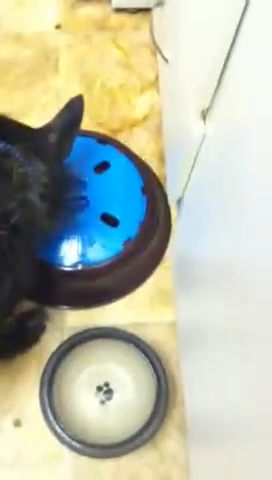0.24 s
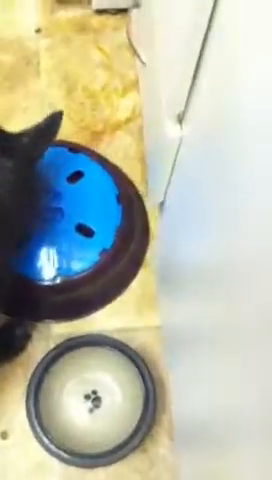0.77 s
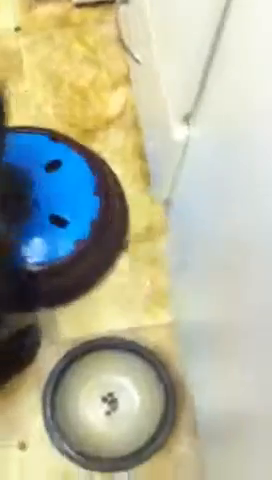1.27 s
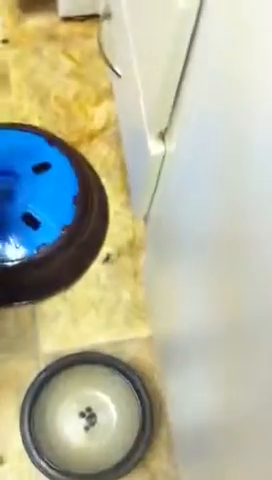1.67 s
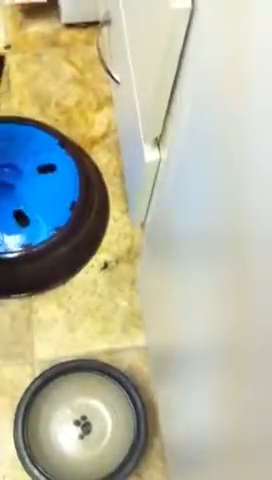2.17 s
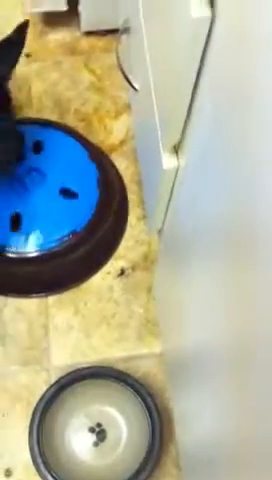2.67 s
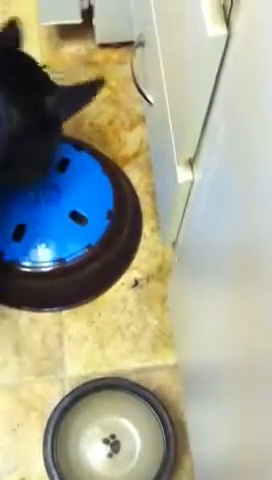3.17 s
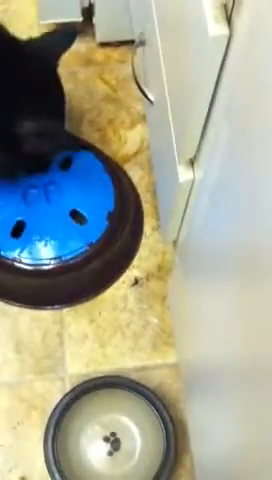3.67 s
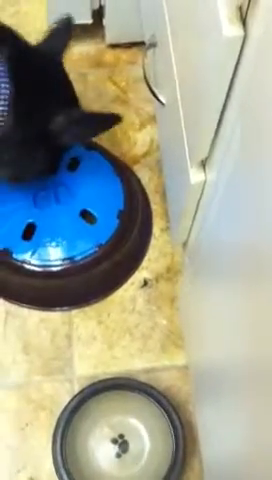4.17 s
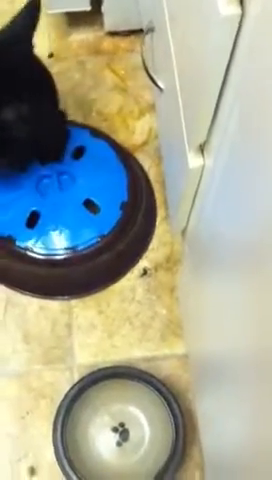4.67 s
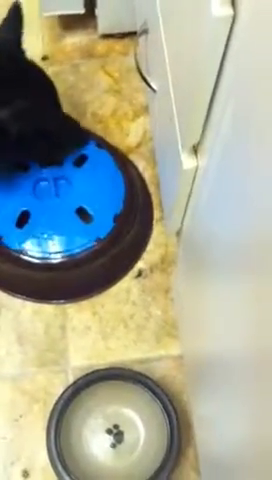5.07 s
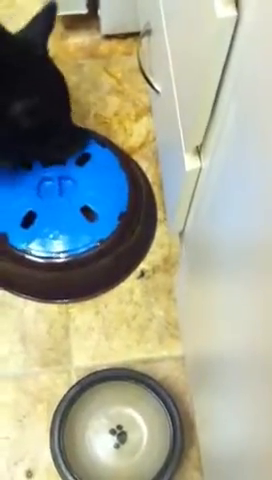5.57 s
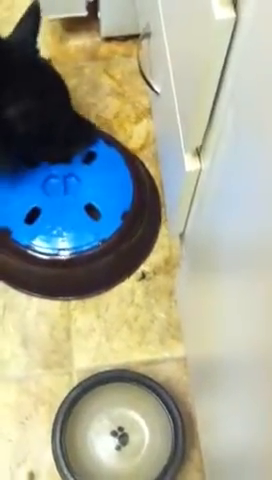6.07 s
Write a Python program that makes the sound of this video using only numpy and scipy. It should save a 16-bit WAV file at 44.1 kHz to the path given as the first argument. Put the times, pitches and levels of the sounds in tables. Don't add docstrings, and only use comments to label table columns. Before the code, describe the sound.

A steady, soft broadband hush and a faint low refrigerator hum hold throughout, in a small kitchen with a short reverberation, heard by a close phone. From 0 to 0.8 seconds only faint, thin collar tags chink. Light plastic taps and pellet ticks start around 0.8, then a strong hollow knock lands at 1.4, with kibble rattling and a rim rap near 1.8. Tags jingle brightly around 2.0 to 2.2. From 2.4 to 3.1 small knocks, clicks and chinks cluster, then stay scattered until a heavy bump near 3.97. Jingling brightens at 4.1 and is busy at 4.4 to 4.9. A loud hollow crack comes at 4.9, followed by dense irregular knocks, floor thuds, lid jolts and sharp kibble snaps through 5.3. Brief lighter gaps follow, with crisp bursts at 5.9 and 6.2, stopping mid-activity around 6.3.

```python
import sys
import numpy as np
from scipy import signal
from scipy.fft import rfft, irfft, next_fast_len
from scipy.io import wavfile

SR = 44100
rng = np.random.default_rng(int(sys.argv[2]) if len(sys.argv) > 2 else 0)


def persist_wave(psi):
    counts = np.round(np.clip(psi, -1, 1) * 32767).astype(np.int16)
    wavfile.write(sys.argv[1], SR, np.atleast_2d(counts).T)


def undo_db(level):
    steps = np.asarray(level, float) / 20
    return 10 ** steps


N = 279153


def along(points, hz):
    f, v = np.transpose(points)
    return np.interp(np.log(hz + 1), np.log(f + 1), v)


def wobble(rate_hz):
    knots = rng.standard_normal(int(N * rate_hz / SR) + 2)
    return np.interp(np.arange(N) * rate_hz / SR, np.arange(len(knots)), knots)


def sample_at(times):
    return np.clip(np.round(times * SR).astype(int), 0, N - 1)


def ring(times, levels_db, body, spread_db, scatter, contact_s, wander, flutter_db):
    modes = [(part, *mode) for part, family in enumerate(body) for mode in family]
    chance = rng.standard_normal((len(times), len(modes), 2))
    where = sample_at(times)
    rise = np.exp(-1 / (abs(contact_s) * SR))
    out = np.zeros(N)
    for k, (part, hz, db, t60) in enumerate(modes):
        turn = np.exp(2j * np.pi * hz / SR * np.cumsum(1 + wander * wobble(rate_hz=25)))
        size = undo_db(levels_db[:, part] + db + spread_db * chance[:, k, 0])
        phase = np.exp(1j * scatter * chance[:, k, 1])
        blows = np.zeros(N, complex)
        np.add.at(blows, where, size * phase / turn[where])
        decay = undo_db(-60 / t60 / SR)
        swing = signal.lfilter([1 - rise], np.poly([rise, decay]), blows)
        out += undo_db(flutter_db * wobble(rate_hz=45)) * np.imag(swing * turn)
    return out


def crack(times, levels_db, lo_hz, hi_hz, t60):
    blows = np.zeros(N)
    np.add.at(blows, sample_at(times), undo_db(levels_db))
    fade = signal.lfilter([1], [1, -undo_db(-60 / t60 / SR)], blows)
    band = signal.butter(2, [lo_hz, hi_hz], "band", fs=SR, output="sos")
    return signal.sosfilt(band, signal.sosfilt(band, fade * rng.standard_normal(N)))


def kinds(*pairs):
    return [(*row[:2], *colour, *row[2:]) for table, colour in pairs for row in table]


def scattered(events, count, lag_s, drop_db):
    rows = np.array(events)
    levels_db = rows[:, 1:2] + np.pad(rows[:, 2:], ((0, 0), (1, 0)))
    bounce = np.arange(count)
    draw = rng.random((len(rows), count, 2))
    lag = np.cumsum(2 * lag_s * draw[:, :, 0] * np.sign(bounce), axis=1)
    loss_db = drop_db * bounce * (1 + draw[:, :, 1]) / 2
    times = (rows[:, :1] + lag).ravel()
    return times, np.concatenate(levels_db[:, None] - loss_db[:, :, None])


def joined(*contacts):
    return [np.concatenate(part) for part in zip(*contacts)]


# t/s, push on the bowl level/dB, swing of the collar level/dB
STIR = [(0.0, -83, -71), (1.07, -59, -92), (1.34, -47, -59.5), (2.73, -56, -61), (2.94, -53.5, -55.5),
        (3.3, -49, -74), (3.75, -52.5, -51), (4.15, -46.5, -43.5), (4.33, -49, -59.5), (4.71, -46, -47),
        (4.85, -50, -37), (5.09, -44.5, -65), (5.399, -45, -43), (5.55, -47, -82), (5.82, -51, -81),
        (6.05, -41.5, -71), (6.33, -51.5, -55)]


def restless(column, count, size_db, groups_db):
    rows, draw = np.array(STIR), rng.random((count, 2))
    times = draw[:, 0] * N / SR
    size = np.interp(times, rows[:, 0], rows[:, column]) - size_db * np.log(1 - draw[:, 1])
    return times, size[:, None] + np.array(groups_db)


# f/Hz, level/dB per Hz
HUSH = [(25, -24), (98, -24), (145, -1.5), (500, -7), (2000, -23.5), (10000, -35), (11600, -45),
        (12500, -46)]


def hush():
    m = next_fast_len(N + 8192)
    spectrum = rfft(rng.standard_normal(m)) * undo_db(along(HUSH, np.fft.rfftfreq(m, 1 / SR)))
    noise = irfft(spectrum, m)[:N]
    noise /= np.sqrt(np.mean(noise ** 2) + 1e-20)
    return undo_db(-52.5 + 0.12 * wobble(rate_hz=3)) * noise


# f/Hz, level/dB
HUM = [(120, -60.5)]


def refrigerator():
    t = np.arange(N) / SR
    return sum(undo_db(db + 3 + 0.26 * wobble(rate_hz=6)) * np.sin(2 * np.pi * hz * t) for hz, db in HUM)


# f/Hz, t60/s
KITCHEN = [(200, 0.35), (800, 0.27), (4000, 0.3), (12000, 0.32)]


def kitchen(x, count=20):
    hz, t, z = signal.stft(rng.standard_normal((count, SR // 2)), SR, nperseg=256)
    tails = signal.istft(z * undo_db(-60 * t / along(KITCHEN, hz)[:, None]), SR, nperseg=256)[1]
    out, step = np.zeros(N + 2 * SR), N // count + 1
    for k, tail in enumerate(tails):
        echo = signal.fftconvolve(x[k * step:][:step], tail / np.linalg.norm(tail))
        out[k * step + 200:][:len(echo)] += echo
    return out[:N]


# f/Hz, level/dB, t60/s
TAGS = [
    [(6890, -20, 0.044), (9854, -1.5, 0.055), (9900, -14, 0.053), (9430, -13, 0.044)],
    [(8400, 1.5, 0.11), (8560, 2, 0.11)],
    [(11630, -1, 0.058), (11500, -11, 0.067)],
    [(13250, -2, 0.085), (14030, 2, 0.1), (14990, 2.5, 0.075), (10760, 7, .05)],
    [(5530, 2.5, 0.11), (3750, -6.5, 0.06)],
    [(10250, -4, 0.078), (10260, -13, 0.07)],
]
# t/s, peak level/dB, big tag level/dB, side tag level/dB
TAG_ALONE = [(1.6776, -32, -29.0, -24), (1.5436, -34, -28, -20.0), (1.957, -42, -27.0, -17.0),
             (2.1278, -31.5, -28.0, -17), (2.2304, -33.5, -22, -13), (2.9084, -38, -27.0, -20),
             (1.998, -51, -32, -20.0), (2.011, -39, -34.0, -20.0), (2.02, -43.0, -31.0, -19.0),
             (4.036, -41, -30.0, -16.0), (4.396, -26.5, -27, -23), (4.7214, -25, -27.0, 4),
             (4.9365, -32, -37, -18.0), (5.2515, -32, -18, -10), (5.4075, -51.0, -30.0, -18.0),
             (6.2455, -35.5, -27, -14)]
TAG_ON_LOW = [(0.227, -51.5, 0.5, -4), (1.1945, -36.5, -12, -2), (1.7, -33.5, -20, -1),
              (3.6047, -45.5, -24, -8), (3.688, -39, -11.0, -7), (3.8437, -31.5, -19.5, -1.5),
              (3.9394, -51, -23.0, -3.0), (4.4243, -35, -17.0, 9), (4.8798, -52, -19.0, 4.0),
              (5.0676, -33.0, -7, -7), (5.1028, -52.0, -26, -12.5)]
TAG_ON_MIDDLE = [(0.4733, -50.0, -26.0, -8), (0.88, -51, -27.0, -2), (1.0545, -49, -18.0, 1),
                 (1.37, -40, -8, -10), (1.8462, -37.5, -23, -8), (2.731, -33, -37, -2),
                 (2.8053, -57.0, -26.0, -2.0), (2.818, -35.5, -28, -5), (2.996, -29, -29, -15),
                 (3.462, -43, -11.5, 0), (4.4928, -35.0, -28.0, -6), (4.6674, -40, -27, 11),
                 (4.8, -52, -18.0, -5), (4.8258, -38.5, -29.0, -5), (4.863, -39.5, -16, -9),
                 (5.215, -28.5, -31.0, -7.0), (6.195, -41, -24.0, -10)]
TAG_BRUSH = [(0.6564, -47.5, -19.0, -2), (1.773, -37.5, -17, -7), (1.9745, -37.0, -20, 1),
             (1.9896, -28, -19, 5), (2.4627, -44.5, -15, -6), (2.6416, -52, -19.0, 2),
             (2.7107, -38.5, -18, -4), (4.907, -30.5, -33, -4.0), (6.07, -41.0, -15.0, 3.0),
             (6.088, -34, -19, 2.5)]
TAG_ON_BIG = [(0.16, -52.5, -10, -10.0), (0.195, -58, -4, -14.0), (0.2652, -40.5, -9, -1),
              (0.31, -59.0, -11.0, -5.0), (0.355, -50.5, -9.0, -11.0), (1.1341, -41, -20, -5),
              (1.291, -30, -14, -11), (2.1084, -52, -11.0, -13.0), (3.0716, -38.5, -10, -11),
              (3.1497, -35, -5, -7), (3.2758, -35.5, -10.0, -16), (4.0865, -25.5, -27, -11.0),
              (4.1625, -34.0, -4, -1), (5.8613, -43, -6, -15)]
# t/s, peak level/dB
TAG_AGAIN = [(1.2922, -39), (5.532, -54), (2.725, -37), (2.743, -47), (3.7, -36), (4.093, -19),
             (4.107, -26), (4.201, -31), (4.7315, -30), (4.743, -33), (4.76, -30), (4.9375, -19),
             (4.9445, -25), (4.957, -47), (5.745, -48), (5.705, -57)]
# t/s, peak level/dB
MIDDLE_AGAIN = [(4.429, -43), (4.436, -46), (4.675, -42), (4.683, -28), (4.696, -53), (4.509, -43),
                (5.223, -32.5), (5.862, -43)]


def tags():
    # low, middle and high tag level/dB under the name tag
    alone, on_low, on_middle = (-44, -19, -28.5), (-8.5, -14, -19), (-20.5, 0.75, -26)
    brush, on_big = (-26, -6.5, -18.5), (-23, -11, -20.5)
    swung, shivered = (-20.5, -13), (-40, 0)
    struck = kinds((TAG_ALONE, alone), (TAG_ON_LOW, on_low), (TAG_ON_MIDDLE, on_middle),
                   (TAG_BRUSH, brush), (TAG_ON_BIG, on_big))
    again = kinds((TAG_AGAIN, alone + swung), (MIDDLE_AGAIN, on_middle + shivered))
    first = scattered(struck, count=2, lag_s=0.0059, drop_db=12.5)
    times, levels_db = joined(first, scattered(again, count=1, lag_s=0, drop_db=0))
    jingle = restless(column=2, count=300, size_db=4.5, groups_db=[-14.5, -26, -15.0, -35, -36, -10])
    chinks = ring(*joined((times, levels_db - 6.5), jingle), TAGS, spread_db=2.0, scatter=0.57,
                  contact_s=0.0001, wander=0.0061, flutter_db=4.0)
    return chinks + crack(first[0], first[1][:, 0] - 11, lo_hz=4750, hi_hz=12100, t60=0.075)


# f/Hz, level/dB, t60/s
LID = [
    [(1880, 5.5, 0.013), (2530, 1.5, 0.014), (2748, 6.5, 0.0082), (3145, -3, 0.024)],
    [(3860, 6.5, 0.007), (4387, 10, 0.013), (4786, 8.5, 0.011), (5390, -6.5, 0.018), (6590, -1.5, 0.016),
     (6660, -4, 0.02)],
]
# t/s, peak level/dB
DULL_CLICKS = [(0.858, -54), (1.8857, -39.5), (2.531, -45), (3.3924, -39.5), (3.5778, -35.5), (3.5918, -32),
               (3.6423, -35.5), (4.029, -36), (4.7272, -36.5), (4.7498, -29), (4.9727, -49), (5.4585, -40),
               (5.6539, -28), (5.784, -38), (5.9445, -27), (6.3126, -44.5)]
# t/s, peak level/dB, bright modes relative to it
# level/dB
PELLET_CLICKS = [(0.7657, -50, -8), (1.2416, -49, -10), (2.0366, -44, -14), (2.3401, -45.0, -13.0),
                 (2.405, -44.5, -16.0), (2.596, -39.5, -13), (2.9014, -45, -15), (3.076, -44, -8),
                 (3.1181, -40.5, -1), (3.3536, -45.5, -15), (3.4246, -41.0, -8), (3.7788, -41, -8.0),
                 (4.3924, -32, -18), (4.583, -35.5, -11), (4.856, -39, -6), (4.8799, -21.5, -9.5),
                 (4.9886, -26, -11.0), (4.9967, -28.5, -7.0), (5.159, -34.5, -17), (5.2261, -22, -12),
                 (5.2711, -18, -15), (5.4262, -33, -11), (5.547, -44, -22), (5.567, -32.0, -16),
                 (5.751, -32, -18), (5.7637, -31.5, -7.5), (5.8608, -38, -8.0), (6.036, -29.5, -19),
                 (6.085, -33.0, -2), (6.15, -34.5, -18),
                 (1.4249, -26, -5), (1.5446, -54.5, 9), (1.697, -38.0, -7), (1.721, -40.5, -11),
                (1.7755, -25.0, -1), (1.989, -41.5, -1), (2.5091, -44.5, -3), (2.585, -44.5, -3),
                (2.679, -47, -7), (2.9542, -37.5, -8), (3.056, -49.0, -3), (3.1027, -42.0, -2.5),
                (3.541, -43.5, -8), (3.72, -43, 2), (3.745, -41.5, 3.5), (3.9636, -32, -1),
                (4.0732, -53, 8), (4.21, -53, 6), (4.2246, -39.5, 1.5), (4.3487, -67, -6),
                (4.4956, -36.5, -9), (5.1031, -18.5, -2.5), (5.227, -29, -3), (5.3654, -39.5, -8),
                (5.423, -43.5, -3), (5.8854, -22, -5), (5.897, -21.5, -11), (6.0619, -28.5, 7.5),
                (6.2002, -22, -11), (6.2296, -27, -12)]
# t/s, peak level/dB
TUMBLES = [(1.344, -53), (1.434, -41), (2.93, -39.5), (2.946, -47), (3.087, -44), (3.112, -38.5),
           (3.125, -37.5), (3.41, -49), (0.79, -45), (3.68, -49), (1.779, -28.5), (0.845, -55),
           (1.806, -32), (1.8105, -42), (3.566, -37), (3.736, -38), (3.971, -45), (3.977, -35.5),
           (4.398, -31), (4.586, -50), (4.755, -50), (4.8855, -20.5), (4.898, -26.5), (5.744, -42),
           (5.112, -42), (5.561, -47), (5.234, -49), (5.24, -44), (5.254, -43), (5.278, -30), (5.294, -48),
           (5.306, -44), (5.435, -33), (5.578, -30.5), (5.646, -40), (5.786, -42), (5.87, -35),
           (5.913, -31), (5.924, -41), (5.936, -48), (0.825, -49.5), (6.048, -31), (6.056, -41),
           (6.0655, -34), (6.071, -38), (6.075, -32), (6.207, -41)]


def kibble():
    dull, tumble = (-41,), (-10,)
    clicked = kinds((DULL_CLICKS, dull), (PELLET_CLICKS, ()), (TUMBLES, tumble))
    times, levels_db = scattered(clicked, count=3, lag_s=0.003, drop_db=10.5)
    low_db, bright_db = levels_db[:, 0], levels_db[:, 1]
    rolling = restless(column=1, count=2500, size_db=3.0, groups_db=[-12])
    clicks = ring(times, levels_db - 9.0, LID, spread_db=2.0, scatter=3.5,
                  contact_s=0.0012, wander=0.024, flutter_db=3.5)
    grit = crack(rolling[0], rolling[1][:, 0], lo_hz=1470, hi_hz=6000, t60=0.014)
    body = crack(times, low_db + 1.0, lo_hz=830, hi_hz=3730, t60=0.027)
    snap = crack(times, bright_db - 0.5, lo_hz=3200, hi_hz=8800, t60=0.024)
    tick = crack(times, bright_db + 16.0, lo_hz=1400, hi_hz=8700, t60=0.00032)
    crumbs = crack(times, low_db - 18.0, lo_hz=1500, hi_hz=5670, t60=0.1)
    lead_in = crack(times - 0.007, low_db - 20, lo_hz=620, hi_hz=4500, t60=0.18)
    return clicks + grit + body + snap + tick + crumbs + lead_in


# f/Hz, level/dB, t60/s
BOWL = [
    [(705.2, 4.5, 0.022), (700, -35, 0.0056), (790.6, -11.5, 0.066)],
    [(924.6, -11, 0.043), (1073, -12.5, 0.023)],
    [(173.2, -5, 0.068), (243.6, 0, 0.03), (338.6, 2.2, 0.028), (396.3, 2.5, 0.041), (457.4, 1.5, 0.048)],
    [(953, -1.5, 0.017), (1200, -21, 0.017), (1320, -8.5, 0.059), (1415, -0.5, 0.019)],
]
# t/s, peak level/dB, then shoulder, floor thud, rim level/dB under it
DOME_KNOCKS = [(0.862, -40.5, -3, -13, -24.0), (1.243, -29, -1, -9, -26.0), (1.426, -8, 3.5, -15.5, -35),
               (1.522, -31.0, -1, -26, -26), (2.367, -36.5, 5.0, -18.0, -17), (2.405, -33, 10, -12.5, -25),
               (2.532, -31, 5, -17, -28), (2.682, -23.5, 6.5, -17.5, -28), (2.709, -31, 2.0, -12, -10),
               (2.753, -36, -1, -21.0, -28.0), (2.902, -33, 9, -24, -24.0), (2.92, -29.5, 11, -15, -25.0),
               (2.956, -19.5, 2.5, -14.5, -11), (3.425, -34.5, 2.5, -14.0, -14),
               (3.657, -42, 4.0, -11.0, -20.0), (3.704, -41, -5, -20, -28.0), (3.781, -25, 5, -16.5, -31),
               (3.967, -12.5, -9.0, -14.0, -16.5), (4.032, -30.0, 15, -7.0, -17),
               (4.143, -35.5, 1.0, -22, -22.0), (4.21, -34.0, 2.0, -11, -21), (4.498, -25.5, 0, -21, -25),
               (4.524, -18, -2, -20.5, -27.0), (4.579, -31.5, 3.5, -25, -28),
               (4.8862, -7.5, -7.0, -34, -11), (5.364, -34, -2.0, -14, -29.0), (5.463, -37, 6, -12, -25.0)]
FOOT_KNOCKS = [(1.06, -45.5, -6, 1, -24.0), (1.451, -54, 6.0, 0, -21.0), (1.692, -47, -7, -3, -29),
               (3.058, -33.5, 4, -4, -10), (3.119, -39.5, 16, 2.5, -24.0), (3.325, -39.5, 3, -15, -29.0),
               (3.356, -27.5, -8, -5.0, -32.0), (3.393, -40.0, 4.0, -8, -13), (4.074, -19.5, -3, -8.5, -25),
               (4.262, -47.5, 3.0, 6.5, -25.0), (4.35, -34, 1.5, -6.5, -27),
               (5.243, -18.5, -3.0, -7.5, -29.0), (5.304, -18.5, -11, -8, -34.0),
               (5.336, -32.5, -2.0, -4, -28.0), (5.569, -26, -0.5, -6.5, -27),
               (6.294, -29.5, -2, -6.5, -29.0)]
SEAT_KNOCKS = [(0.81, -43.5, -1, -1.5, 2.5), (2.042, -42.0, 8, -9, -4), (2.454, -54, 20, -4, 6.0),
               (2.593, -45.5, 20.5, 1, 5), (3.553, -38, 7, -10.0, -12.0), (3.59, -44.5, 12, 4, -8),
               (3.994, -33, -3.0, 1, -1), (4.398, -34, -2, -8.0, -16), (4.551, -32, 8, -8.0, -3),
               (4.729, -34.0, 9.5, -11, -4.5), (4.84, -32.5, 3, -8, -13), (4.908, -45.0, 3.0, -10, -4.0),
               (4.991, -29.5, 0, -11, -3), (5.064, -31, -5.0, -7, -20), (5.103, -27.5, -3.0, -17, -11.0),
               (5.124, -32, -6, -13, -13), (5.183, -31, -2, -10.0, -11), (5.214, -35, 2, -16, -3),
               (5.275, -23, 3, -9.5, -15), (5.428, -31.5, 12.5, -6, -1), (5.639, -45, 6, 3, -7),
               (5.753, -39, 19.5, 4, -5), (5.862, -38.0, 8, -7, 0), (5.885, -31.5, 6, -2.5, -8),
               (5.946, -33.0, -16, -9, -2), (6.037, -34.5, -17, -3.5, 3), (6.061, -31.5, 5, -2.5, -3),
               (6.084, -35, 9, -8.0, -14), (6.175, -40.0, 8, 3, 3), (6.204, -26, 4, -9.5, 2)]
# t/s, peak level/dB
RIM_KNOCKS = [
    (1.774, -23),
    (1.809, -37),
]
# t/s, peak level/dB
DOME_TONES = [(1.407, -34), (1.4295, -20), (1.441, -38), (1.466, -49), (1.483, -43), (2.69, -37),
              (2.908, -34.5), (2.933, -34), (2.944, -38), (3.672, -30.5), (3.789, -53), (3.963, -22),
              (3.98, -32), (4.008, -31), (4.052, -38), (4.51, -29), (4.8815, -10), (4.898, -44),
              (4.931, -42), (4.952, -42), (5.0, -35.5), (5.237, -22.5), (5.287, -42), (5.316, -33),
              (5.349, -40), (5.443, -34.5), (5.76, -43), (6.209, -25), (6.225, -33)]
# t/s, peak level/dB
THUDS = [(1.846, -45.5), (1.869, -41.5), (2.597, -38.5), (4.57, -37.5), (5.069, -36), (5.222, -44),
         (5.289, -40), (5.355, -40), (5.764, -36), (5.878, -29.5), (6.18, -42), (6.217, -40), (6.26, -40.5)]


def bowl():
    # shoulder, floor thud and rim level/dB under the dome
    dome, rim, thud = (-0.59, -16, -35), (0.5, -14, 8.3), (0.5, 2.9, -6)
    knocked = kinds((DOME_KNOCKS + FOOT_KNOCKS + SEAT_KNOCKS, ()), (RIM_KNOCKS, rim),
                    (DOME_TONES, dome), (THUDS, thud))
    times, levels_db = scattered(knocked, count=2, lag_s=0.00504, drop_db=17.5)
    shuffle = restless(column=1, count=500, size_db=2.0, groups_db=[-5, 2, -8.5, -12])
    knocks = ring(*joined((times - 0.0015, levels_db + 1.0), shuffle), BOWL, spread_db=1.0, scatter=0.75,
                  contact_s=0.0028, wander=0.016, flutter_db=0.27)
    drag = crack(times, levels_db[:, 0] - 2, lo_hz=392, hi_hz=1780, t60=0.029)
    return knocks + drag


def scene():
    metal, plastic = tags(), bowl() + kibble()
    plastic = signal.lfilter(*signal.butter(1, 140, "high", fs=SR), plastic)
    echoes = kitchen(undo_db(-6.0) * metal + undo_db(-10.5) * plastic)
    return (metal + plastic + echoes + hush() + refrigerator())[None]


def low_pass(x):
    return signal.sosfilt(signal.butter(12, 15920, fs=SR, output="sos"), x)


def record(dry):
    mix = signal.sosfilt(signal.butter(8, 15700, "low", fs=SR, output="sos"), dry)
    return low_pass(mix)


dry = scene()
out = record(dry)
persist_wave(out)
```